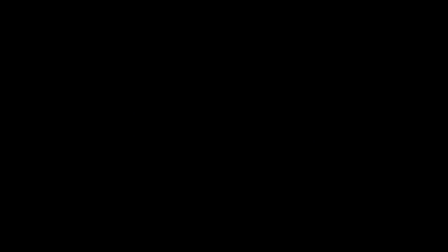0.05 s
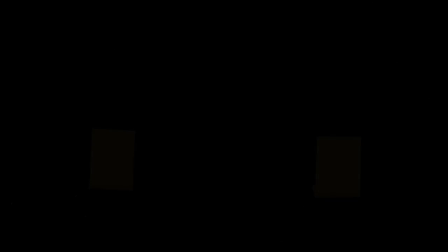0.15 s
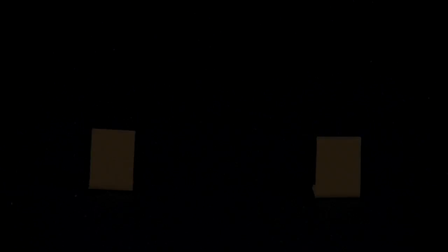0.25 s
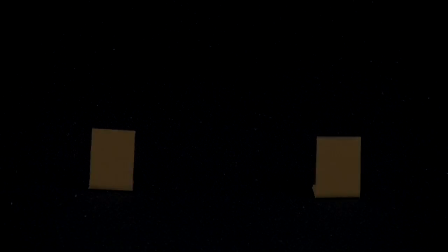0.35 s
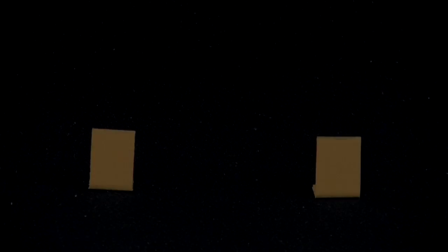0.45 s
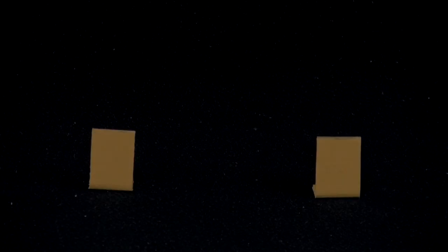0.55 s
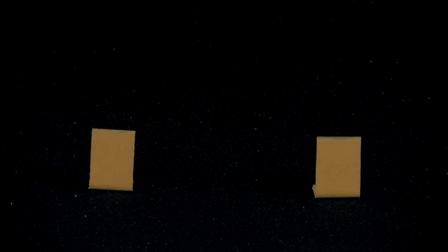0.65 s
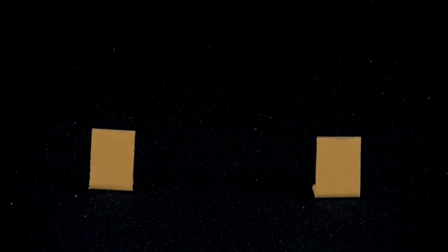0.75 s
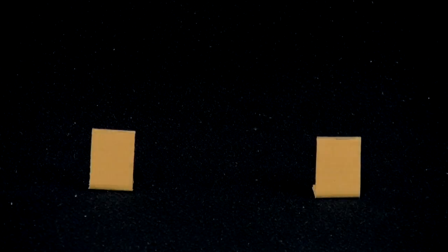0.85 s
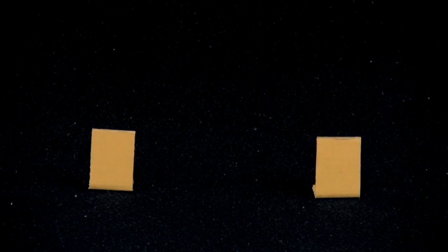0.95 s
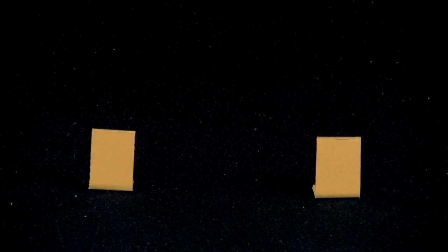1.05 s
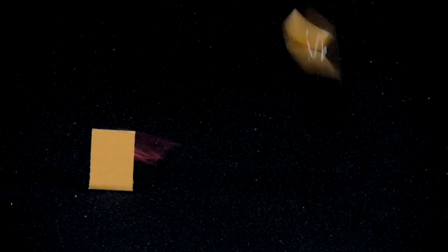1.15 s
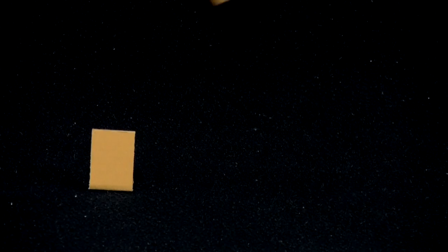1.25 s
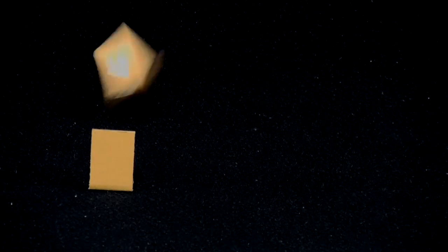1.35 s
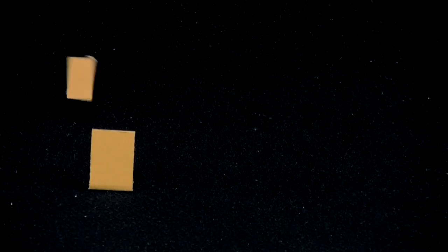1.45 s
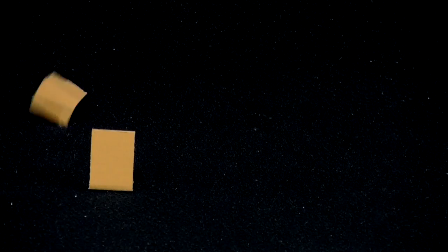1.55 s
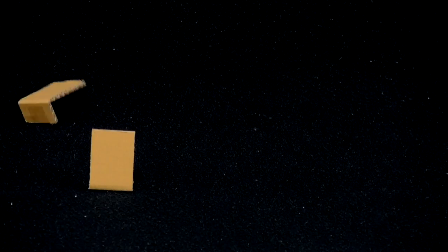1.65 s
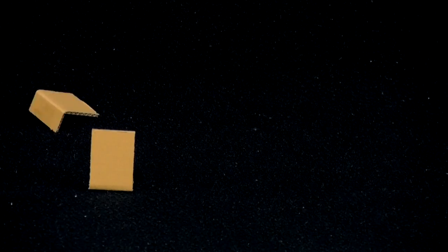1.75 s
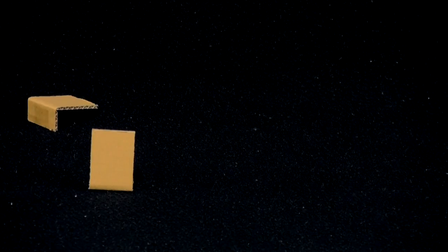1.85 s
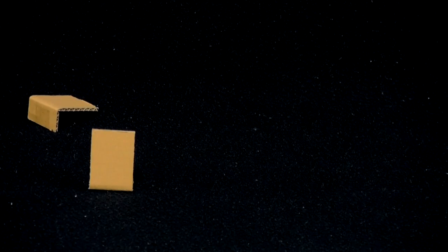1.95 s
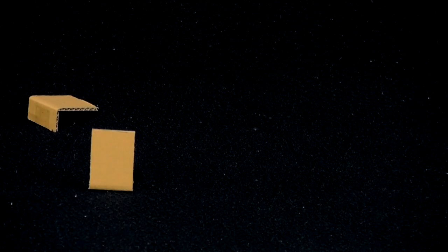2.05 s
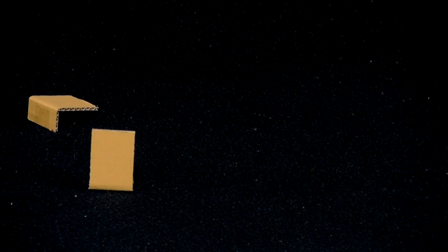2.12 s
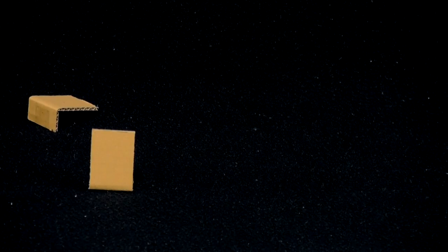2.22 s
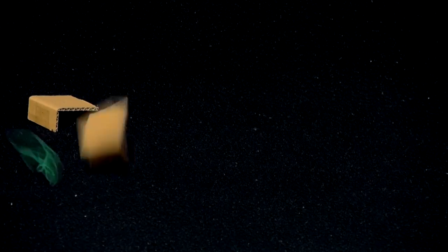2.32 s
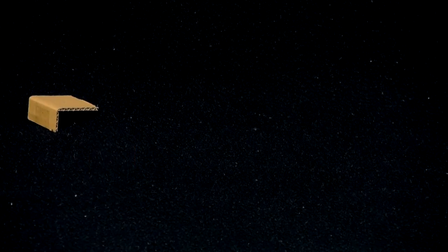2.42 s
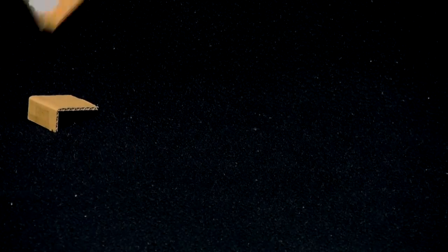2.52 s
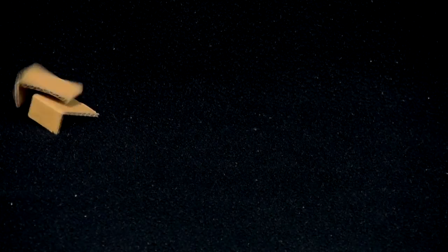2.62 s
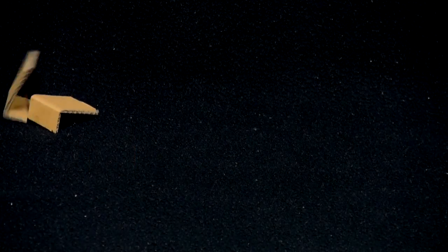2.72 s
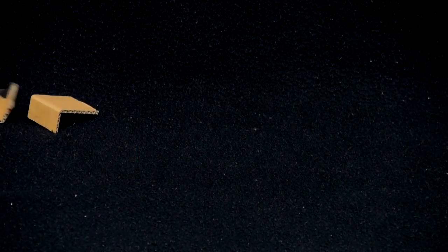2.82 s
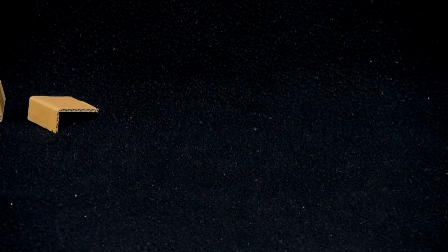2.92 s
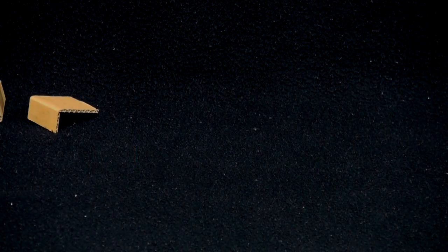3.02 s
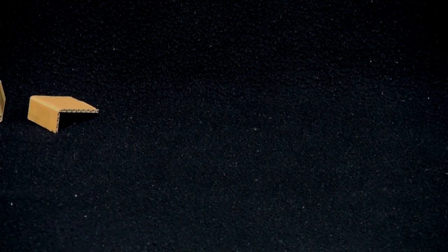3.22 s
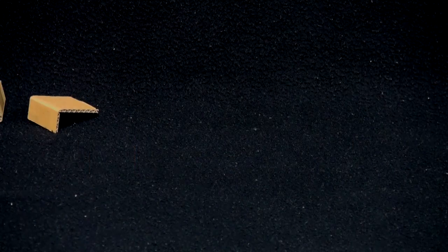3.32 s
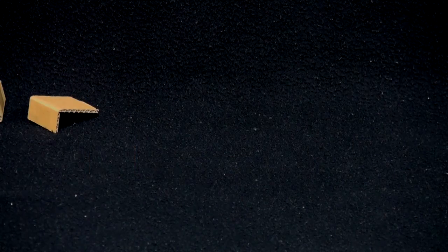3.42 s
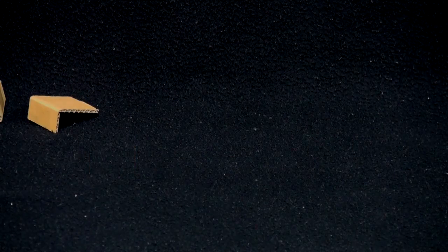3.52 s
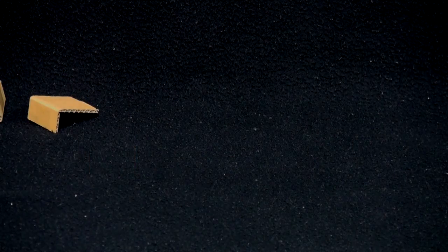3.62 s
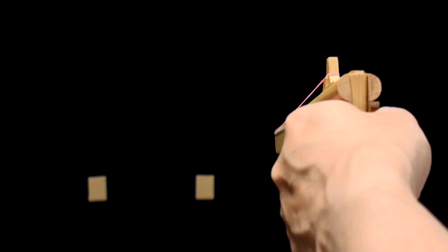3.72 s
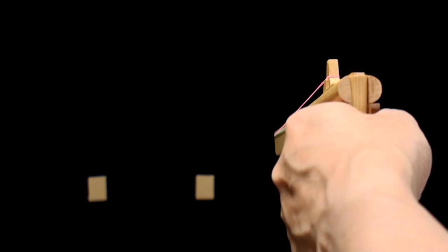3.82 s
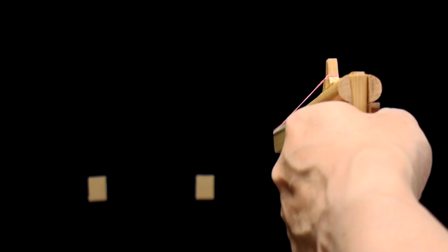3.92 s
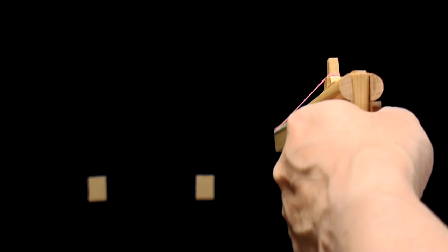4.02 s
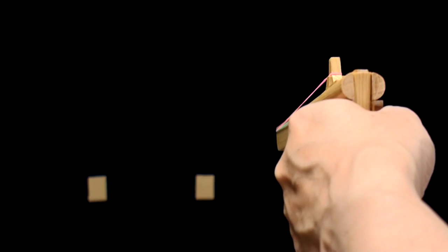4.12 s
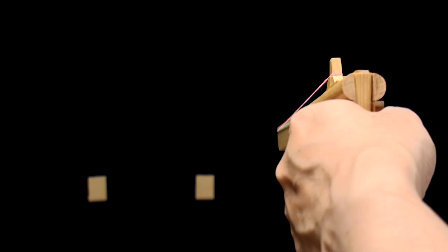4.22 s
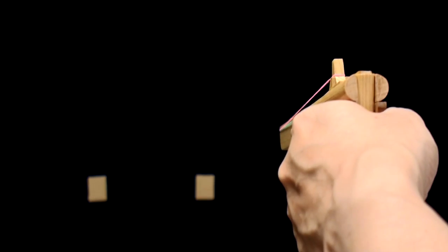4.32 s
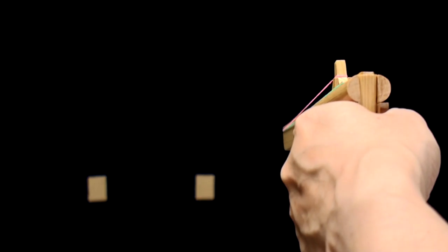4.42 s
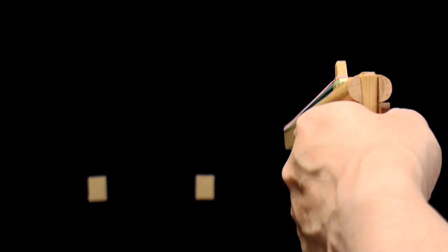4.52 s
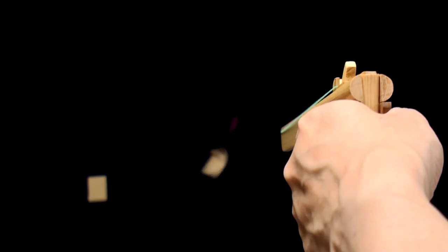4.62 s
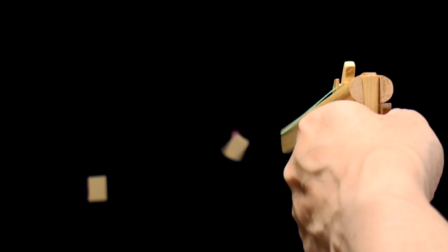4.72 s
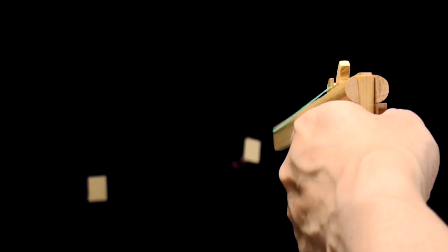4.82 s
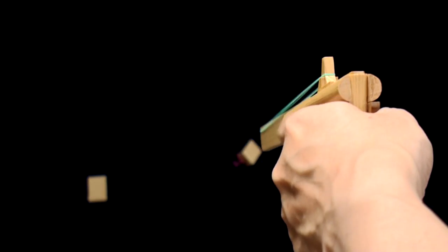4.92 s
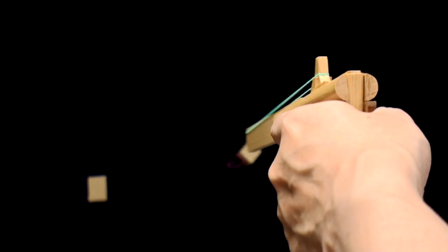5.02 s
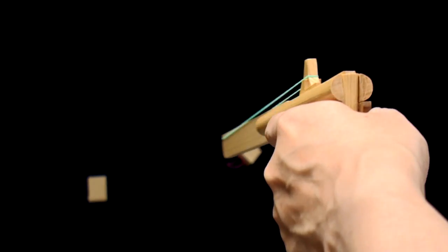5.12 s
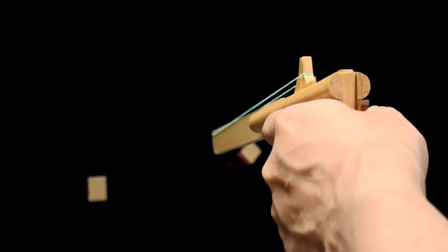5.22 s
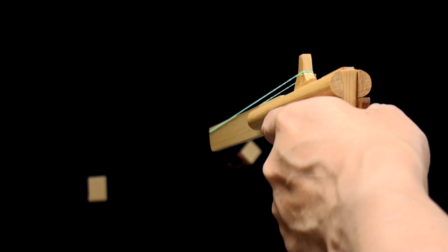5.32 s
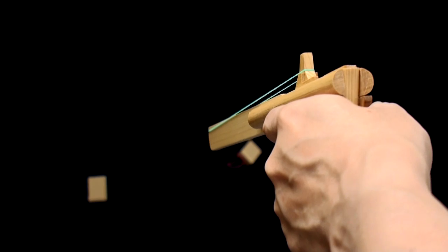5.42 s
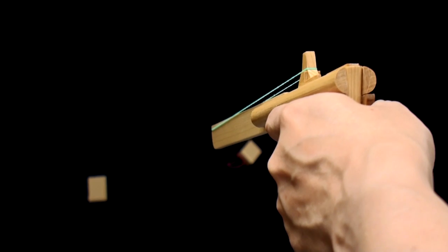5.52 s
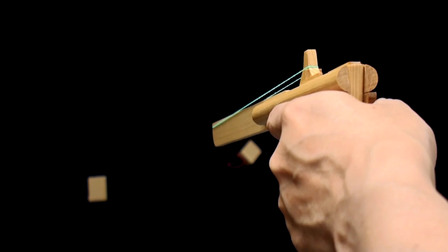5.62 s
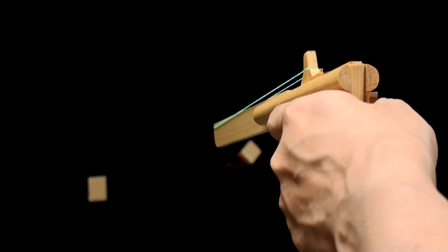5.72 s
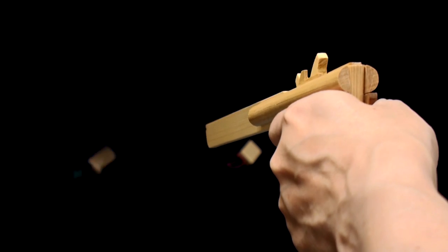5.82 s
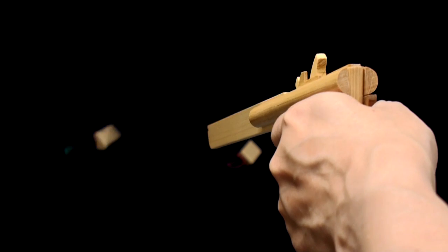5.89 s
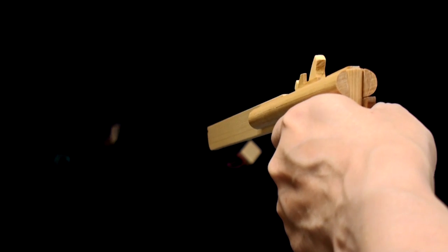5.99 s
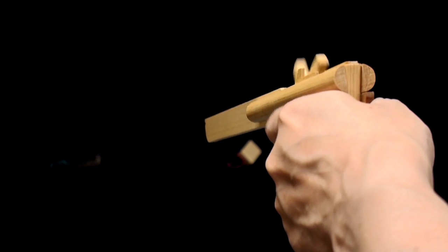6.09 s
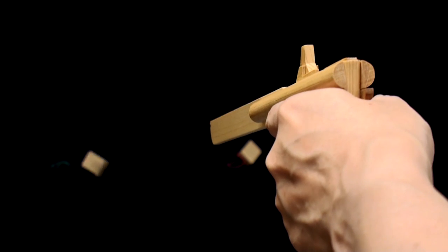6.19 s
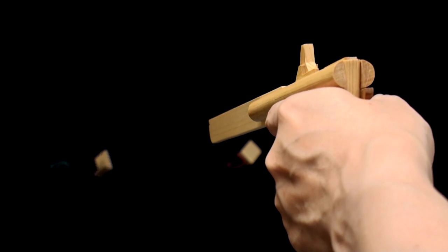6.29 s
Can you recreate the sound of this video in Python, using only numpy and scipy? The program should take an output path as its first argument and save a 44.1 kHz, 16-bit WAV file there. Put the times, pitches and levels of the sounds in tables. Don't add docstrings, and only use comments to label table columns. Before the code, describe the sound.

After a brief silence, quiet hiss, mains hum and a faint cricket chorus appear, with one cricket chirping rapidly. Four separate shots follow: wooden click, then a louder slap of rubber on cardboard, ringing off hard walls. The third slap is duller and drier, the fourth crackling and ringing. After each, the card lands with small taps or ticks. The microphone picks up much of the lively small room.

```python
import sys
import numpy as np
from scipy import signal
from scipy.fft import rfft, irfft
from scipy.io import wavfile

SR = 44100
rng = np.random.default_rng(int(sys.argv[2]) if len(sys.argv) > 2 else 0)


def boost_factor(decibels):
    exponent = np.asarray(decibels, float) / 20
    return 10 ** exponent


def store_pcm(level_fs):
    pcm = np.round(np.clip(level_fs, -1, 1) * 32767).astype(np.int16)
    wavfile.write(sys.argv[1], SR, np.atleast_2d(pcm).T)


N = 280017


# (time [s], peak [dB], wood pitch [Hz], ring [dB], room [dB])
CATCH_SNAPS = [
    (1.1182, -11.5, 3320, 7, 0),
    (2.3374, -24, 4470, -9, -19),
    (2.3408, -14, 3170, 5, 1),
    (4.57, -12, 5900, 12, -2),
    (4.5855, -23, 9500, 2, -3),
    (4.597, -16, 9900, 8, -10),
    (4.6011, -19.5, 3070, 4, -1),
    (5.8061, -21.5, 5500, -3, 5.5),
    (5.8102, -18.5, 3190, 18, -8.5),
]


def catch_snaps(tails):
    rows = [(s, db, hz, ring_db, 9400, room_db) for s, db, hz, ring_db, room_db in CATCH_SNAPS]
    return clicks(rows, tails, 0.98, low_breadth=0.077, high_breadth=0.63, flat_db=2, top_hz=12300)


# (time [s], peak [dB], room [dB], crack [dB], thud [dB])
BAND_SLAPS = [
    (1.159, -6, 2.5, 4.5, -8),
    (2.3612, -9, 4, 2, -6),
    (4.629, -8, 0, -9.5, -26),
    (5.8413, -8, 3.5, 10, -14.5),
]
# (frequency [Hz], width [Hz], level [dB])
CARD_MODES = [
    [(2486, 45, 12.5), (4500, 110, 4.5), (5950, 20, 10), (6320, 94, -8), (8100, 310, -14), (9800, 13, -29),
     (12400, 170, -0.5)],
    [(2186, 28, 19.5), (4230, 170, -11), (5850, 70, -8), (5960, 31, 8.5), (6500, 87, 10), (9200, 31, 3),
     (10050, 62, 9), (12430, 41, 8)],
    [(1044, 240, -8), (2435, 130, -1), (3050, 88, -6), (4350, 14, -4.5), (5780, 63, -2), (6500, 86, -7),
     (7880, 35, -4.5), (11200, 450, -4.5), (13000, 130, -8)],
    [(1900, 20, 9.5), (2127, 20, 19), (2600, 60, 10.5), (3800, 120, 14), (5330, 110, 9), (6450, 95, 20.5),
     (8810, 59, -16), (11500, 300, 7.5), (12900, 55, 6.5)],
]
# (delay [ms], level [dB])
CARD_ECHOES = [(3.9, -5.5), (5.3, -11), (6.4, -13), (17.5, -20)]


def band_slaps(tails):
    out = np.zeros((2, N))
    click = signal.unit_impulse(2000)
    crack = steep(click, 4840, 8100)
    thud = steep(click, 290, 1740)
    for k, (slap, modes) in enumerate(zip(BAND_SLAPS, CARD_MODES)):
        s, level_db, room_db, crack_db, thud_db = slap
        parts = [boost_factor(crack_db) * crack, boost_factor(thud_db) * thud]
        for hz, width_hz, mode_db in modes:
            damping_hz = 150 + 0.033 * hz * hz / 5000
            parts.append(boost_factor(mode_db) * steep(click, hz, width_hz + damping_hz))
        add(out, blend(parts), s, level_db, room_db, 1.0, tails[-1 - k], CARD_ECHOES)
    return out


# (time [s], peak [dB], ring [dB], edge resonance [Hz], room [dB])
HARD_LANDINGS = [
    (1.357, -15.5, -11, 5100, -6),
    (4.9674, -17, -1.5, 6300, -6),
    (6.1772, -24, 8, 5540, -9),
]


def hard_landings(tails):
    rows = [(s, db, 1710, ring_db, edge_hz, room_db) for s, db, ring_db, edge_hz, room_db in HARD_LANDINGS]
    return clicks(rows, tails, 0.56, low_breadth=0.44, high_breadth=0.52, flat_db=-4, top_hz=14000)


# (time [s], peak [dB])
CARD_KNOCKS = [
    (2.6626, -25),
    (2.6792, -29),
]


def card_knocks(tails):
    rows = [(s, db, 2210, 16.5, 6100, -11.5) for s, db in CARD_KNOCKS]
    return clicks(rows, tails, 0.42, low_breadth=0.16, high_breadth=0.54, flat_db=-4, top_hz=13000)


# (time [s], peak [dB], pitch [Hz])
TABLE_SKIMS = [
    (4.9515, -33, 4200),
    (4.9565, -32, 6200),
    (6.1525, -49, 7800),
]


def table_skims(tails):
    rows = [(s, db, hz, -1.5, 8500, -9) for s, db, hz in TABLE_SKIMS]
    return clicks(rows, tails, 0.88, low_breadth=.5, high_breadth=0.37, flat_db=-3, top_hz=12000)


# (time [s], peak [dB], pitch [Hz], room [dB])
CORNER_TICKS = [(2.5966, -43, 9000, -12), (2.6007, -39, 8500, -3), (2.627, -34, 1990, -3.5),
                (2.667, -36, 3500, -11.5), (4.8572, -34, 5200, -12), (4.86, -34, 4350, -12),
                (4.8734, -44, 4740, -13)]


def corner_ticks(tails):
    rows = [(s, db, hz, 6, 6640, room_db) for s, db, hz, room_db in CORNER_TICKS]
    return clicks(rows, tails, 0.75, low_breadth=0.39, high_breadth=0.067, flat_db=-16.0, top_hz=10000)


# (time [s], peak [dB], pitch [Hz], ring [dB])
SOFT_THUDS = [
    (1.435, -60.5, 294, 8),
    (2.665, -48, 610, -4.5),
    (4.635, -55, 316, 20),
    (4.865, -68.5, 237, 18),
    (5.845, -58.5, 393, 12),
]


def soft_thuds(tails):
    rows = [(s, db, hz, ring_db, 2.3 * hz, 6.5) for s, db, hz, ring_db in SOFT_THUDS]
    return clicks(rows, tails, 1.9, low_breadth=0.89, high_breadth=0.72, flat_db=-48, top_hz=3000)


# (time [s], peak [dB], pitch [Hz], ring [dB])
BAND_BRUSHES = [
    (2.33, -37, 3880, 0),
    (6.039, -43.5, 5660, -25),
]


def band_brushes(tails):
    rows = [(s, db, hz, ring_db, 2.12 * hz, -9.5) for s, db, hz, ring_db in BAND_BRUSHES]
    return clicks(rows, tails, 2.5, low_breadth=0.99, high_breadth=0.33, flat_db=-24, top_hz=12900)


# (time [s], peak [dB], pitch [Hz], room [dB])
TRIGGER_CREAKS = [
    (1.082, -53, 6500, 0),
    (3.822, -51, 7400, -16),
    (4.422, -47, 6500, -6),
]


def trigger_creaks(tails):
    rows = [(s, db, hz, -5, 1.14 * hz, room_db) for s, db, hz, room_db in TRIGGER_CREAKS]
    return clicks(rows, tails, 0.93, low_breadth=0.24, high_breadth=0.15, flat_db=-34, top_hz=13000)


# (first chirp centre [s], period [s], chirps [count])
LONE_CHIRPS = [
    (0.252, .1975, 18),
    (3.912, .1975, 13),
]
# (time [s], left-right difference [dB])
CRICKET_LEAN = [(0, 2.5), (3.74, 2), (3.76, 1.5), (6.35, 2)]


def crickets():
    t = np.arange(N) / SR
    chirp_s = 0.066
    gate = np.zeros(N)
    for first, period, count in LONE_CHIRPS:
        for k in range(round(count)):
            gate += np.exp(-((t - first - period * k) / chirp_s) ** 4)
    chorus = narrow_pair(5620, 220, 0.81) + 0.87 * narrow_pair(5455, 350, 0.78)
    lone = gate * narrow_pair(3774, 140, 0.66)
    lean_db = np.interp(t, *np.transpose(CRICKET_LEAN))
    return (boost_factor(-58) * chorus + boost_factor(-64.5) * lone) * boost_factor([lean_db / 2, -lean_db / 2])


def mains_hum():
    wavering = 0.56 * narrow_pair(243.5, 22, 1.0)
    wavering = wavering + 0.35 * narrow_pair(125.8, 14.5, 0.9) + .5 * narrow_pair(67.4, 50, 1.05)
    steady = 1.1 * np.sin(2 * np.pi * 240.3 * np.arange(N) / SR)
    return boost_factor(-62.5) * (wavering + steady)


# (frequency [Hz], level [dB per Hz])
HISS_COLOUR = [(30, -14.5), (75, -17), (160, -12), (800, -11.5), (2000, -17.5), (6500, -27), (12100, -30),
               (14000, -28)]
# (frequency [Hz], left-right likeness [0-1])
HISS_WIDTH = [(60, 1.05), (130, 1), (290, 0.51), (640, 0.17), (1400, 0.017), (12000, 0.14)]


def hiss():
    white = rng.standard_normal((2, 2, N))
    return boost_factor(-54.5) * unit(bands(white, lambda hz: boost_factor(at_hz(HISS_COLOUR, hz)), HISS_WIDTH))


# (frequency [Hz], decay by 60 dB [s])
ROOM_DECAY = [(300, 0.6), (790, 0.49), (2090, 0.47), (5510, 0.39), (14600, 0.3)]
# (frequency [Hz], left-right likeness [0-1])
ROOM_WIDTH = [(60, 0.79), (180, 1), (550, 0.99), (1650, 0.78), (4970, 0.86), (15000, 0.6)]


def room_tails(count, rise_ms, gap, t60_share, lump_db, lump_ms=30):
    t = np.arange(SR // 2) / SR
    white = rng.standard_normal((count, 2, 2, len(t))).transpose(1, 2, 0, 3)
    lumps = np.repeat(rng.standard_normal((count, len(t) // 50)), 50, axis=1)
    lumps = lumps * lump_db * np.exp(-t * 1000 / lump_ms)
    swell = (1 - np.clip(gap, 0, 1) * np.exp(-t * 1000 / rise_ms)) * boost_factor(lumps)

    def decay(hz):
        return boost_factor(-60 * t / (t60_share * at_hz(ROOM_DECAY, hz)))

    tails = bands(white * swell, decay, ROOM_WIDTH)
    return tails.transpose(1, 0, 2) / np.sqrt(SR / 1000)


# (delay [ms], level [dB])
TABLE_ECHOES = [(4.4, -4), (8.7, -11)]


def clicks(rows, tails, scatter_ms, low_breadth, high_breadth, flat_db, top_hz):
    out = np.zeros((2, N))
    dulling = signal.butter(2, min(top_hz, 19000), fs=SR, output="sos")
    click = signal.sosfilt(dulling, signal.unit_impulse(2000))
    crack = boost_factor(flat_db) * resonance(click, 1600, 10100)
    for k, (s, level_db, low_hz, low_db, high_hz, room_db) in enumerate(rows):
        low = boost_factor(low_db) * steep(click, low_hz, low_breadth * low_hz)
        high = steep(click, high_hz, high_breadth * high_hz)
        colour = blend([low, high, crack])
        add(out, colour, s, level_db, room_db, scatter_ms, tails[k % len(tails)], TABLE_ECHOES)
    return out


def add(out, colour, s, level_db, room_db, scatter_ms, tail, echoes):
    path = boost_factor(room_db) * tail
    for ms, echo_db in [(0, 0.01)] + echoes:
        at = round(ms * (1 + .04 * rng.standard_normal()) * SR / 1000)
        wave = boost_factor(echo_db) * burst(scatter_ms)
        path[:, at:at + wave.shape[1]] += wave
    heard = boost_factor(level_db) * signal.fftconvolve(path, colour[None] / np.max(np.abs(colour)), axes=1)
    at = round((s + .0008) * SR)
    out[:, at:at + heard.shape[1]] += heard[:, :N - at]


def burst(ms):
    t = np.arange(400) / SR * 1000 / ms
    shared = rng.standard_normal(len(t))
    own = rng.standard_normal((2, len(t)))
    wave = .5 * (shared + .45 * own) * np.sqrt(t) * np.exp(-t)
    wave[:, round(ms * SR / 4000)] -= .4
    energy = np.mean(np.sum(wave ** 2, axis=1))
    return wave / np.sqrt(energy / (ms * SR / 10000))


def blend(parts):
    power = sum(np.abs(rfft(part, 4096)) ** 2 for part in parts)
    cepstrum = irfft(np.log(power + 1e-16) / 2)
    cepstrum[1:2048] *= 2
    cepstrum[2049:] = 0
    return irfft(np.exp(rfft(cepstrum)))[:2000]


def resonance(x, hz, width_hz):
    r = np.exp(-np.pi * width_hz / SR)
    turn = 2 * np.pi * min(hz, 16000) / SR
    return signal.lfilter(np.array([1, 0, -1]) * (1 - r * r) / 2, [1, -2 * r * np.cos(turn), r * r], x)


def steep(x, hz, width_hz):
    return resonance(resonance(x, hz, width_hz), hz, width_hz)


def stereo(mid, side, alike):
    alike = np.clip(alike, 0, 1)
    centre = np.sqrt(1 + alike) * mid
    spread = np.sqrt(1 - alike) * side
    return np.array([centre + spread, centre - spread])


def narrow_pair(hz, width_hz, alike):
    mid, side = steep(rng.standard_normal((2, N)), hz, width_hz)
    return unit(stereo(mid, side, alike))


def bands(white, gain, likeness):
    out = 0
    edges = 22 * 2 ** np.arange(0, 10, .5)
    for k, (low, high) in enumerate(zip(edges, edges[1:])):
        band = signal.butter(2, [low, high], "band", fs=SR, output="sos")
        mid, side = signal.sosfilt(band, white[k % 2])
        hz = np.sqrt(low * high)
        out = out + gain(hz) * stereo(mid, side, at_hz(likeness, hz))
    return out


def unit(x):
    return x / np.sqrt(np.mean(x ** 2) + 1e-20)


def at_hz(points, hz):
    table_hz, value = np.transpose(points)
    return np.interp(np.log(hz), np.log(table_hz), value)


def scene():
    open_air = room_tails(count=8, rise_ms=25.0, gap=1.0, t60_share=0.87, lump_db=6.5)
    on_table = room_tails(count=6, rise_ms=4.4, gap=0.3, t60_share=0.82, lump_db=3.0)
    gun = catch_snaps(open_air) + band_slaps(open_air)
    impacts = hard_landings(on_table[3:]) + card_knocks(on_table[1:]) + table_skims(on_table)
    rustles = corner_ticks(on_table) + soft_thuds(on_table) + band_brushes(on_table)
    night = crickets() + mains_hum() + hiss()
    return gun + impacts + rustles + trigger_creaks(on_table) + night


def treble_gate(x):
    quiet_hz, climb_hz, slack_db = 12850, 385, 2.5
    hz, _, frames = signal.stft(x, SR, nperseg=1024)
    treble = np.abs(frames[:, (hz > 11000) & (hz < 12800)]) ** 2
    treble_db = 10 * np.log10(treble.mean(axis=(0, 1)) + 1e-20)
    over_db = np.maximum(treble_db - np.median(treble_db) - slack_db, 0)
    open_bins = hz[:, None] < quiet_hz + climb_hz * np.sqrt(over_db)
    return signal.istft(frames * open_bins, SR, nperseg=1024)[1][:, :N]


def band_limit(x):
    return signal.sosfilt(signal.butter(12, 16290, fs=SR, output="sos"), x)


def record(dry):
    start_s, fade_s = 0.15, 0.0032
    gate = np.clip((np.arange(N) / SR - start_s) / fade_s, 0, 1)
    mix = treble_gate(dry * gate)
    return band_limit(mix)


dry = scene()
out = record(dry)
store_pcm(out)
```